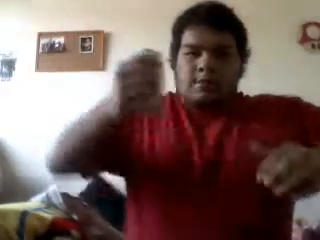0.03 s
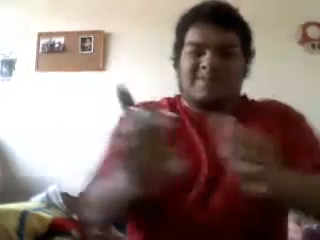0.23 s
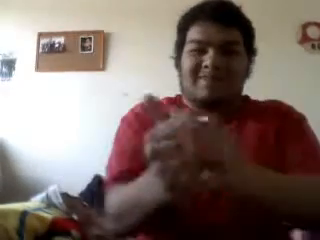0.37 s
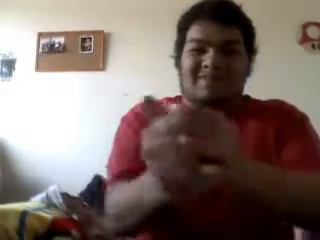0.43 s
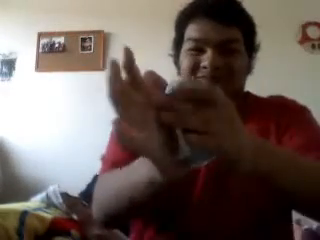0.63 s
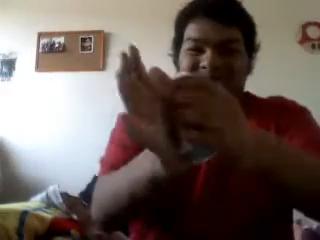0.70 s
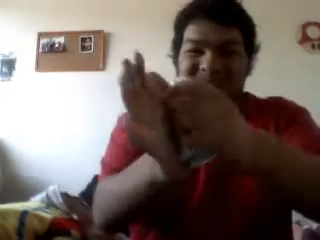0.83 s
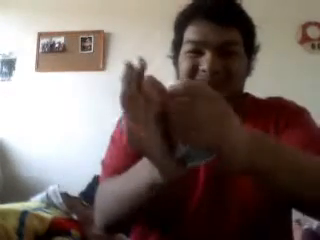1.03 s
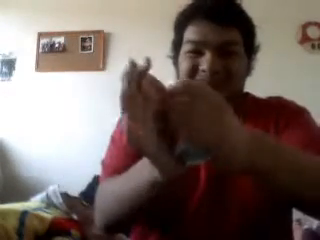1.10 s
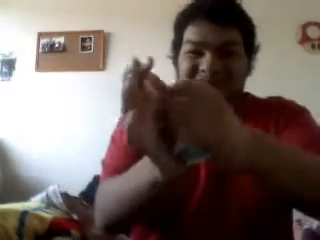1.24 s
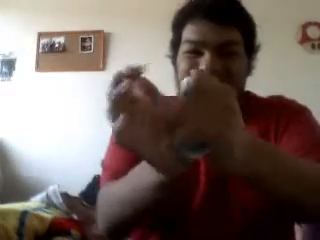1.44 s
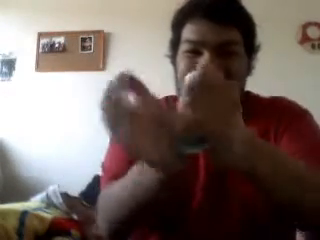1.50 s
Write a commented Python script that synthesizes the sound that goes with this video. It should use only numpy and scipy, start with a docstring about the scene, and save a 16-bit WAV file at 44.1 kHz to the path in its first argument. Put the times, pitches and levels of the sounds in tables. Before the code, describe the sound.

A thin aluminium can is crushed between hands. Faint creaks break into sharp, bright snaps and fine crackle from about 0.1 seconds. After a short lull, loud snaps come near 0.5, 0.6 and 0.8 seconds, some ringing briefly and hollowly. Duller snaps follow near 1.1 and 1.3 seconds as the can flattens, with small clicks until 1.5. The small room echoes slightly over a faint hum.

```python
"""Faint creaks and crackle break at once into sharp snaps: two hands crush a thin aluminium can.
Each fold of the wall buckles with a snap a few milliseconds long, loud and bright at first, duller
as the can flattens. Tiny slips of the creasing metal run between the snaps, the hollow can rings
after some of them, and air puffs out as it caves in. A small, bright room answers over a faint hum."""
import sys
import numpy as np
from scipy import signal
from scipy.fft import rfft
from scipy.io import wavfile
from scipy.ndimage import uniform_filter1d

SR = 44100
rng = np.random.default_rng(int(sys.argv[2]) if len(sys.argv) > 2 else 0)


def output_pcm(signal):
    """Save a mono or channel-first signal as 16-bit PCM at the path in sys.argv[1].

    Samples are clipped to [-1, 1] before scaling.
    """
    pcm = np.clip(np.atleast_2d(signal).T, -1, 1) * 32767
    wavfile.write(sys.argv[1], SR, np.round(pcm).astype(np.int16))


N = 68355
HZ = np.fft.rfftfreq(4096, 1 / SR)  # the frequencies every EQ curve is drawn on


def amp(db):
    """Decibels to gain."""
    return 10 ** (np.asarray(db) / 20)


def unit_rms(x):
    """Scales a sound to an rms of one."""
    return x / np.sqrt(np.mean(x ** 2) + 1e-20)


def curve(points, hz=HZ):
    """Joins breakpoints along a log-frequency axis."""
    point_hz, values = np.transpose(points)
    return np.interp(np.log(hz + 1), np.log(point_hz + 1), values)


def add(mix, start_s, sound):
    """Mixes a sound in at its start time."""
    part = mix[round(start_s * SR):][:len(sound)]
    part += sound[:len(part)]


def eq(x, gain_db):
    """Minimum-phase EQ, so nothing rings ahead of an attack."""
    log_gain = np.log(amp(np.r_[gain_db, gain_db[-2:0:-1]]))
    taps = np.fft.ifft(np.exp(np.conj(signal.hilbert(log_gain)))).real
    return signal.fftconvolve(x, taps[:len(HZ)])[:len(x)]


# Colour of the quiet room. Each row: frequency in Hz, relative gain in dB.
ROOM_TONE_EQ = [(25, -10.5), (60, -22.5), (110, -13), (170, -7), (260, 1), (370, -1.5), (600, -24.5),
                (1200, -7), (2500, -15.5), (5000, -30), (9000, -23.5), (12000, -29.5)]

def room_tone(level_db=-58.5, hum_hz=386, hum_width_hz=17, hum_boost_db=8):
    """A bed of faint, steady noise in which one low resonance hums."""
    hum = hum_boost_db / (1 + ((HZ - hum_hz) / hum_width_hz) ** 2)
    return amp(level_db) * unit_rms(eq(rng.standard_normal(N), curve(ROOM_TONE_EQ) + hum))


# Swells of the wall's fine crackle and of the dull creaks under the palms.
# Each row: time in seconds, level in dB.
CRACKLE_SWELLS = [(0, -64), (.06, -76), (.1, -37), (.17, -49), (.22, -44), (.285, -35), (.36, -85),
                  (.43, -60), (.5, -40.5), (.56, -48), (.66, -72), (.73, -41.5), (.78, -57), (.87, -73),
                  (1.0, -81), (1.1, -51), (1.2, -78), (1.55, -76.5)]
CREAK_SWELLS = [(0, -69), (.05, -51.5), (.15, -48.5), (.22, -49), (.35, -56.5), (.42, -63.5), (.52, -43.5),
                (.66, -58.5), (.82, -65), (.92, -64.5), (1.02, -52.5), (1.07, -60), (1.13, -42),
                (1.21, -68.5), (1.28, -45), (1.36, -60.5), (1.55, -63)]
# Their colours, crisp and muffled. Each row: frequency in Hz, relative gain in dB.
CRACKLE_EQ = [(100, -25), (500, -8.5), (1500, 5), (4000, 5), (9000, -0.5), (12000, -6)]
CREAK_EQ = [(60, -28.5), (200, -11), (380, 2.5), (650, 4.5), (950, 4), (1400, -3.5), (2300, -25),
            (5000, -16), (12000, -47)]

def creasing(swells, colour, slips_per_s, spread_db=4):
    """The metal gives in many tiny slips of random size, swelling with the squeeze."""
    sizes = amp(spread_db * np.minimum(rng.exponential(1, N), 2.3))
    signs = rng.choice([-1, 1], N)
    slipping = rng.random(N) < slips_per_s / SR
    slips = eq(sizes * signs * slipping, curve(colour))
    level_db = np.interp(np.arange(N) / SR, *np.transpose(swells))
    return unit_rms(slips) * amp(level_db)


# Reverb length. Each row: frequency in Hz, seconds to fall 60 dB.
REVERB_T60 = [(150, 0.64), (400, 0.31), (1000, 0.16), (3000, 0.26), (6000, 0.22), (10000, 0.18)]
# Slaps off near surfaces. Each row: delay in seconds, level in dB against the tail.
REFLECTIONS = [(.0047, 2), (.0092, -2.5), (0.0127, -4.5), (0.016, -9.5)]
# Colour of the reverb. Each row: frequency in Hz, relative gain in dB.
REVERB_EQ = [(100, -3), (350, -2), (700, -5), (1500, 0.5), (3000, -1), (6000, -0.5), (9000, 1.5),
             (12000, -1)]

def reverb(predelay_s=0.0026, build_s=0.0079, smear_s=0.0029, gain_db=3.5):
    """The room's answer to a click: scattered reflections and a tail, each band dying at its own speed."""
    t = np.arange(SR // 3) / SR
    hz, age_s, bands = signal.stft(rng.choice([-1., 1.], len(t)), SR, nperseg=256)
    fade = 10 ** (-3 * age_s / curve(REVERB_T60, hz)[:, None])
    tail = signal.istft(bands * fade, SR, nperseg=256)[1][:len(t)]
    early = sum(amp(db) * np.exp(-((t - delay_s) / smear_s) ** 2) for delay_s, db in REFLECTIONS)
    build = np.clip((t - predelay_s) / build_s, 0, 1)
    response = tail * (build + early)
    return eq(response / np.linalg.norm(response), gain_db + curve(REVERB_EQ))


def burst(decay_s, rise_s=0.00085, smoothing_hz=900):
    """The raw attack of a snap: chaotic noise of about unit energy, its broad spectrum flattened."""
    t = np.arange(len(HZ)) / SR
    noise = rng.standard_normal(len(t)) * (1 - np.exp(-t / rise_s)) * np.exp(-t / decay_s)
    power = abs(rfft(noise, 2 * len(HZ) - 2)) ** 2
    broad_power = abs(uniform_filter1d(power, int(smoothing_hz / HZ[1])))
    return eq(noise, -10 * np.log10(broad_power + 1e-9))


# The snaps; the row at 0.5927 s is a short, quick snap just before the loud one at 0.599 s. # Each row: start
# in seconds, level in dB at 1300 Hz before trim, resonances and can EQ, then low, # presence, treble and top in
# dB against that level, three panel resonances in Hz, decay in # milliseconds, reverb send in dB.
SNAP_CUES = [(0.0279, -5, -17, -7.5, -13.5, -26, 340, 1790, 6980, 1.9, -6.5),
             (0.0445, -16.5, 2, 2, -32, -31, 345, 1380, 1810, 1.3, -2),
             (0.0637, -8, -11, 6.5, -6.5, -7.5, 388, 1340, 1700, 3.3, -8),
             (0.0797, -14, -21, -3, -26, -27, 600, 1770, 2130, 1.3, -3),
             (0.096, -2, 0.5, -14, -3, -23, 336, 1570, 7880, 1.4, -5.5),
             (0.1028, 6.5, 1, 0, -0.5, 8.5, 1155, 2950, 6210, 2.16, -7.5),
             (0.1513, -11, 11.5, 0, 5, 5.5, 895, 1330, 7840, 0.37, -10),
             (0.2028, 6.5, 2.5, -7.5, -15.5, -20, 1190, 3240, 6100, 1.2, -9),
             (0.2168, -9.5, -4, -9, -8, 2.5, 1160, 4600, 7700, 1.7, -1),
             (0.2286, 2, -0.5, 2.5, 9.5, 6.5, 470, 1290, 2490, 1.9, -6),
             (0.2802, 8, -2.5, 6.5, 1, 7, 676, 1475, 4400, 1.9, -8),
             (0.2923, -7, -19, 7.5, 2, 9, 1720, 4300, 8680, 1.1, -1.5),
             (0.403, -9.5, 4, -8.5, -18, -12, 350, 5860, 7460, 2.8, -4),
             (0.457, -6.5, 6, -10, 0.5, 3.5, 3240, 3430, 6660, 2.2, -12),
             (0.4719, -14.5, 2, -13, -3, 3.5, 1180, 3190, 8100, 1.1, -5.5),
             (0.4877, 7, -4.5, -7, -9, -5, 740, 3230, 7900, 1.07, -6.5),
             (0.5051, 16, -8.5, -17.5, -11, -12.5, 2150, 3020, 5970, 0.57, -11),
             (0.52, -6, 9.5, 11.5, -2, 3, 1240, 7340, 7670, 1.1, -12),
             (0.5927, -6, 1, 5.5, -0.5, 8.5, 2040, 3500, 6350, 0.6, -0.5),
             (0.599, 10.5, -7, 6, 2, -1.5, 1620, 6600, 8700, 2.7, -15.5),
             (0.7081, 0, 3, -4.5, -4.5, -3, 346, 2920, 5600, 1.26, -2.5),
             (0.724, -10.5, 5, 17, 14, 19.5, 1060, 2490, 4100, 1.8, -8),
             (0.7379, -17.5, -1, 9, 6, 12.5, 340, 4500, 9300, 1, -8.5),
             (0.7746, -10.5, -14, -8, 6, 2.5, 720, 2600, 3540, 2.3, 2.5),
             (0.7857, 11, -7, -2.5, -7.5, 1.5, 875, 2810, 5970, 1.06, -10.5),
             (0.8141, 3.5, -0.5, 5.5, -18, -17, 790, 4600, 5700, 1.9, -16),
             (0.8287, -3.5, -5, -13, -15, -26, 790, 1450, 4300, 0.88, -5),
             (0.8876, -22.5, 8, 18, -1, -18, 696, 940, 4410, 0.9, -13.5),
             (0.9039, -11, 6.5, -9, -25, -31, 305, 736, 4440, 0.81, -11),
             (0.9465, -19.5, 13, -16, -17, -38, 648, 7400, 8050, 0.67, -4),
             (0.9609, -11.5, 11, 9.5, 1.5, -2.5, 665, 1150, 6100, 0.94, -4),
             (0.9641, -4, 1.5, 3, -5, -3, 720, 3290, 6000, 2, -13),
             (0.9788, 3.5, -9, 0, -13.5, -20, 690, 2950, 6900, 1.26, -11),
             (1.0209, -17, 10, -6, -24, -27, 728, 3520, 5940, 1.4, -21),
             (1.0757, -2.5, -6, -6, 2, -2, 1024, 2930, 5920, 2.5, -16),
             (1.078, 4.5, -2.5, -8, -17.5, -13, 3510, 5860, 6780, 1.4, -5),
             (1.1053, 15.5, -21, -32.5, -31, -39, 1980, 4360, 8700, 0.77, -10),
             (1.108, 8, -5.5, -7.5, -28, -23, 627, 3130, 5900, 0.63, -13.5),
             (1.1745, -6.5, 5, -21, -16.5, -21.5, 300, 1150, 3020, 1.3, -7.5),
             (1.2369, 0, 14.5, -16.5, -52, -39, 1207, 2595, 3700, 0.77, -7.5),
             (1.262, 0.5, -4, -27, -39, -52.5, 639, 1590, 2090, 0.94, -12),
             (1.2713, 1, -8, -22, -32, -32, 560, 3270, 4750, 0.95, -5.5),
             (1.2836, 13, -21.5, -23, -26.5, -37, 560, 2630, 4520, 1.4, -12.5),
             (1.2993, -6.5, 0.5, -14, -13, -24, 1300, 3000, 5990, 1.1, -12),
             (1.4209, -5, -12.5, -3.5, -12, -27, 870, 1460, 8440, 1.1, -10),
             (1.4543, -17.5, -20, -7, -9, -15.5, 300, 943, 1542, 0.97, -15)]
# So small a radiator loses its bass. Each row: frequency in Hz, gain in dB.
CAN_EQ = [(25, -28), (60, -28.5), (110, -27.5), (200, -15), (330, -7), (500, 0.5), (10500, 0),
          (14000, -16.5)]
# Peaks and dips of the flattened can between cupped palms.
# Each row: centre in Hz, half-width in Hz, gain in dB.
PALM_CAVITY = [(665, 83, 2.5), (1005, 124, -15), (1314, 130, 5), (1787, 200, 4.5), (2200, 220, -3),
               (3284, 220, 6.5), (3760, 264, -7.5)]

def snaps(trim_db=-1, panel_boost_db=11, flattened_s=0.95):
    """A buckling panel flips in a burst that the hands damp at once, and sprays the room its own way."""
    out = np.zeros(N)
    cavity = sum(db / (1 + ((HZ - hz) / width_hz) ** 2) for hz, width_hz, db in PALM_CAVITY)
    for start_s, level_db, low, presence, treble, top, *panel_hz, decay_ms, send_db in SNAP_CUES:
        snap = amp(send_db) * reverb()
        add(snap, 0, burst(decay_ms / 1000))
        colour = curve([(560, low), (1300, 0), (3090, presence), (5820, treble), (8250, top)])
        for hz in panel_hz:
            width_hz = 107 + 0.027 * hz
            colour += panel_boost_db / (1 + ((HZ - hz) / width_hz) ** 2)
        if start_s > flattened_s:
            colour += cavity
        add(out, start_s, eq(snap, trim_db + level_db + colour + curve(CAN_EQ)))
    return out


# Tones of the can. Each row: start in seconds, pitch in Hz, level in dB, seconds to fall 60 dB.
CAN_TONES = [(.043, 357, -37.5, .09), (0.2033, 1253, -29, 0.053), (.281, 1617, -29.5, 0.15),
             (.281, 717, -29, 0.028), (.505, 1233, -29, 0.13), (0.503, 6160, -16, 0.023),
             (.599, 930, -35, 0.23), (.599, 960, -27, 0.042), (.599, 1910, -32, 0.089),
             (.786, 798, -35.5, 0.38), (.786, 862, -38.5, 0.19), (.786, 930, -36, .2),
             (.786, 2740, -23, 0.033), (.786, 4130, -25, .05), (1.106, 614, -34, 0.15)]

def ringing(rise_s=0.0031):
    """The hollow can rings after some snaps, at new pitches as each fold changes its shape."""
    out = np.zeros(N)
    t = np.arange(SR // 2) / SR
    attack = 1 - np.exp(-(t / rise_s) ** 2)
    for start_s, hz, level_db, t60 in CAN_TONES:
        envelope = attack * 10 ** (-3 * t / t60)
        add(out, start_s, amp(level_db) * envelope * np.sin(2 * np.pi * hz * t))
    return out


# Puffs of air. Each row: start in seconds, level in dB.
AIR_PUFFS = [(0.102, -54), (0.119, -53), (0.458, -57), (.597, -50.5), (1.284, -77.5)]
# Their bass-heavy colour. Each row: frequency in Hz, relative gain in dB.
PUFF_EQ = [(20, -4), (60, 0.5), (120, -5.5), (250, -27), (1000, -53.5)]

def puffs(decay_s=0.012):
    """Soft, low thumps of air pushed aside as the can caves in."""
    out = np.zeros(N)
    t = np.arange(SR // 8) / SR
    for start_s, level_db in AIR_PUFFS:
        air = unit_rms(eq(rng.standard_normal(len(t)), curve(PUFF_EQ)))
        add(out, start_s, amp(level_db) * np.exp(-t / decay_s) * air)
    return out


def scene(crease_send_db=-4):
    """The mono mix: creases and snaps with reverb, rings and puffs dry, room tone underneath."""
    crackle = creasing(CRACKLE_SWELLS, CRACKLE_EQ, slips_per_s=1200)
    creaks = creasing(CREAK_SWELLS, CREAK_EQ, slips_per_s=600)
    creases = crackle + creaks
    crease_reverb = amp(crease_send_db) * signal.fftconvolve(creases, reverb())[:N]
    return (creases + crease_reverb + ringing() + puffs() + room_tone() + snaps())[None]


# Colour of the microphone. Each row: frequency in Hz, gain in dB.
MICROPHONE_EQ = [(20, -3.5), (9400, -1), (10000, -9), (10650, -9.5), (10850, -35.5), (11200, -47),
                 (11420, -14), (12100, -24), (12700, -37), (14000, -61)]

def record(dry, high_cut_hz=13000):
    """A small microphone with a notch in its top octave, then a steep high cut."""
    heard = eq(dry[0], curve(MICROPHONE_EQ))
    high_cut = signal.firwin(511, high_cut_hz, window=("kaiser", 9), fs=SR)
    return signal.fftconvolve(heard, high_cut, "same")[None]


dry = scene()
out = record(dry)
output_pcm(out)
```